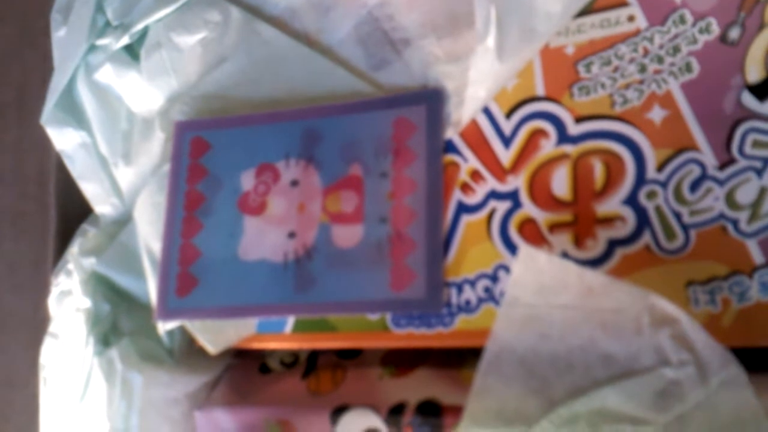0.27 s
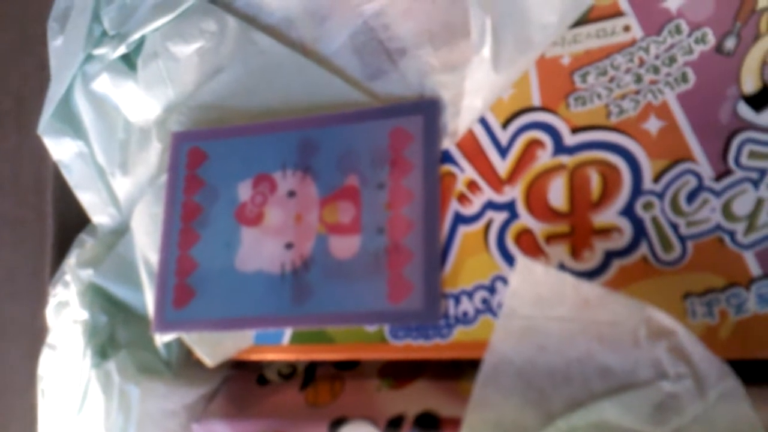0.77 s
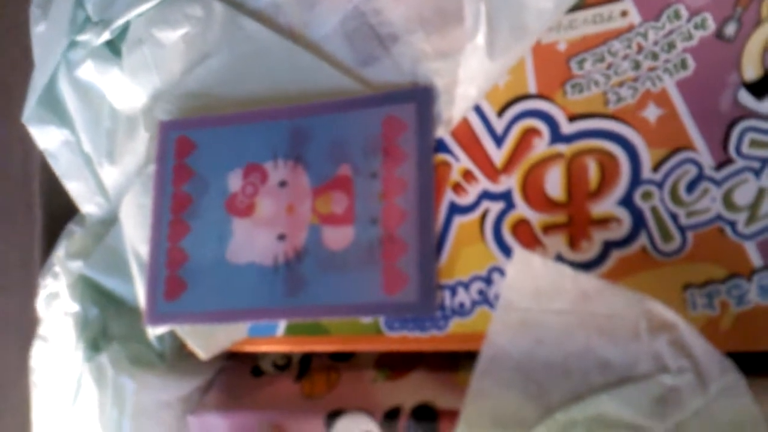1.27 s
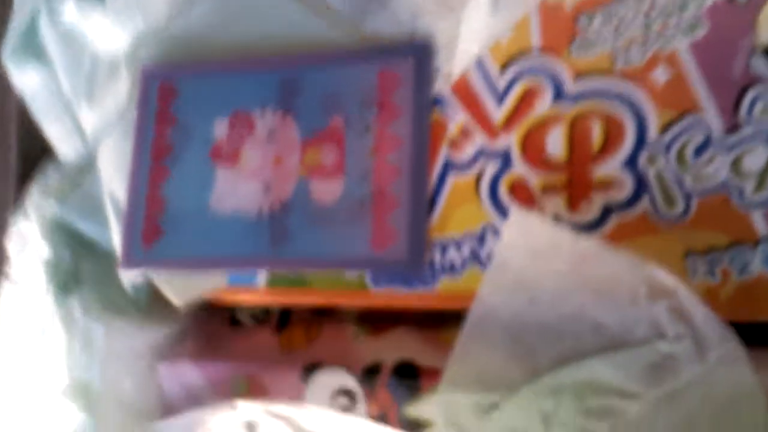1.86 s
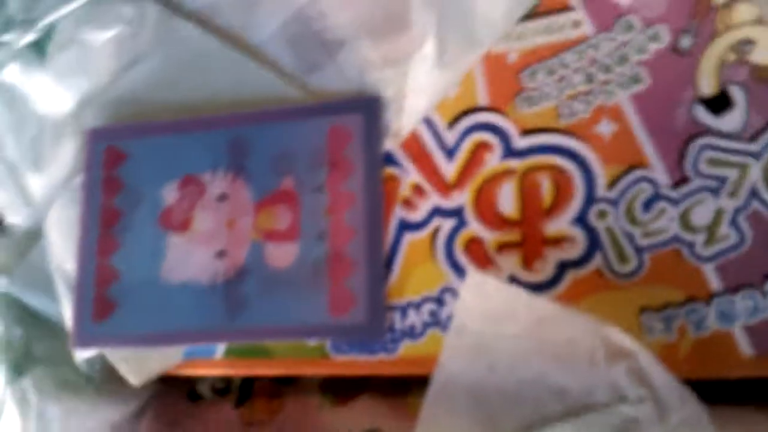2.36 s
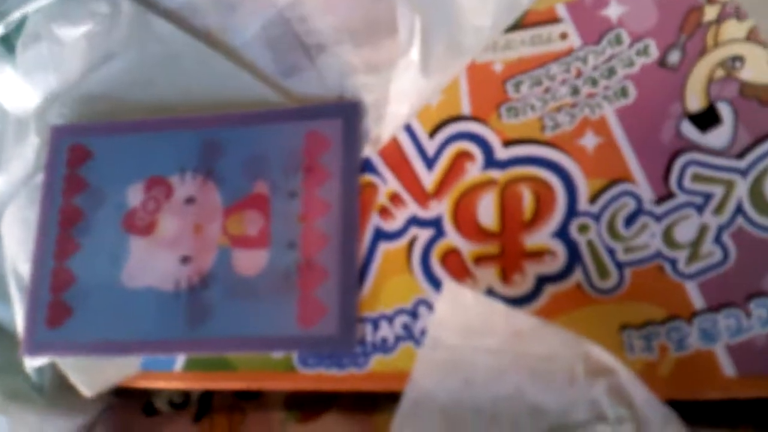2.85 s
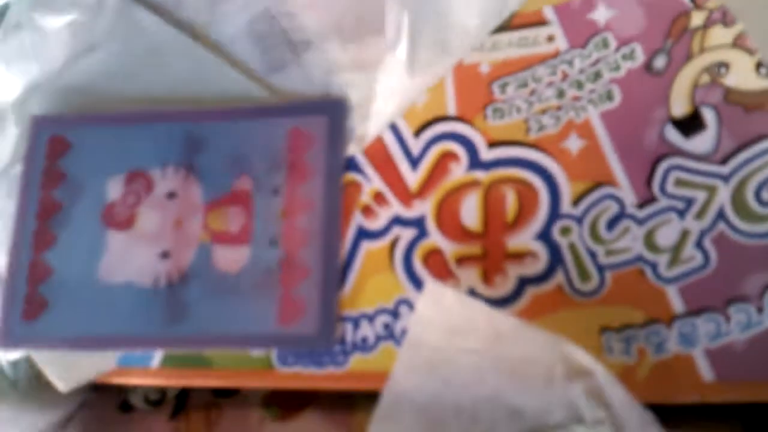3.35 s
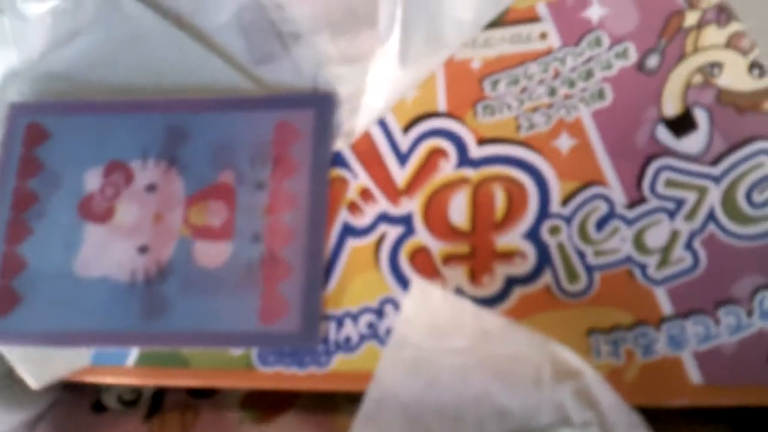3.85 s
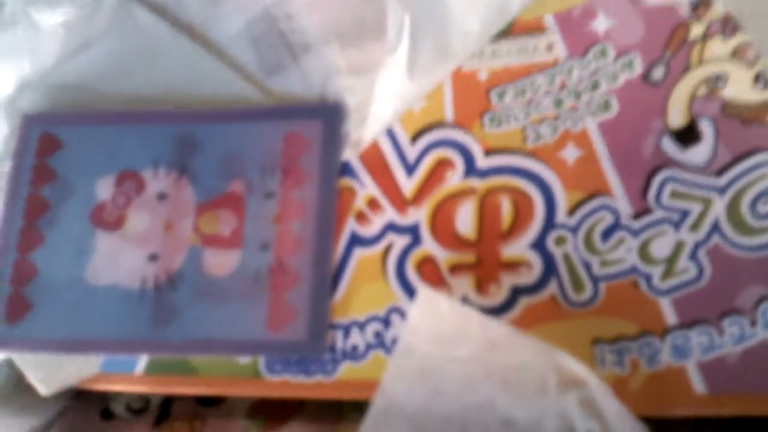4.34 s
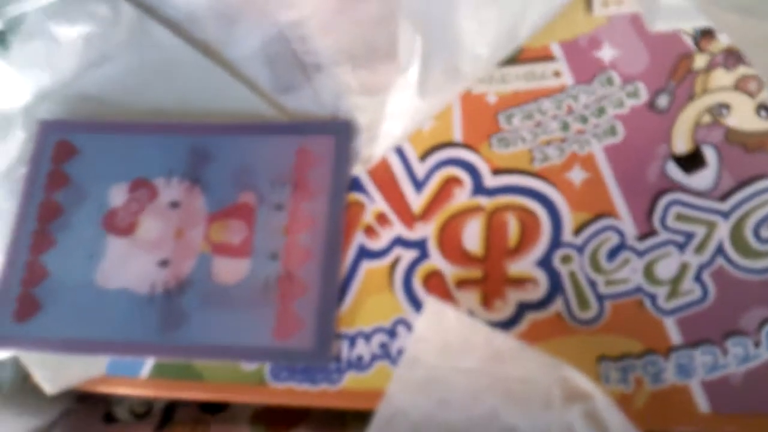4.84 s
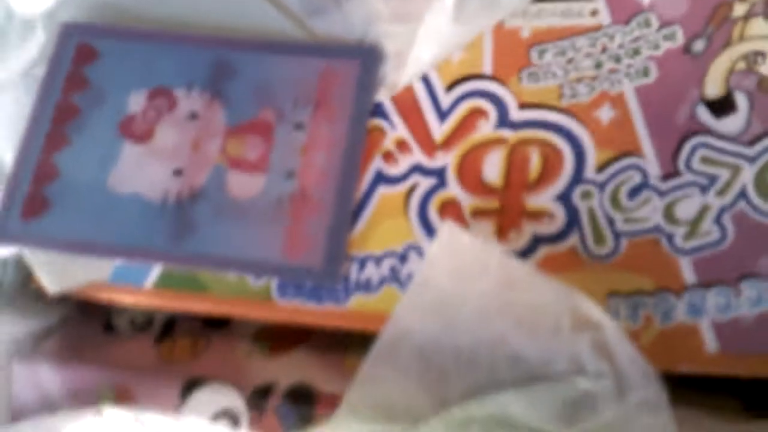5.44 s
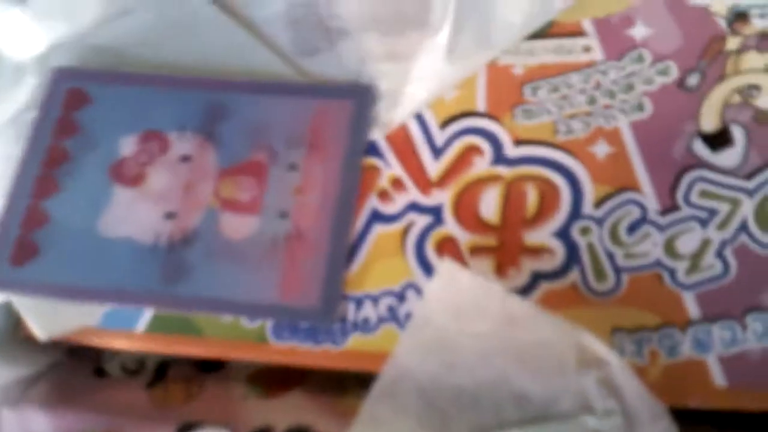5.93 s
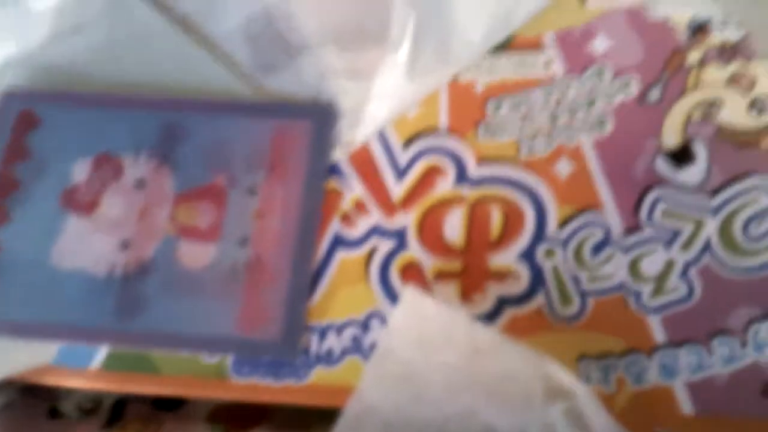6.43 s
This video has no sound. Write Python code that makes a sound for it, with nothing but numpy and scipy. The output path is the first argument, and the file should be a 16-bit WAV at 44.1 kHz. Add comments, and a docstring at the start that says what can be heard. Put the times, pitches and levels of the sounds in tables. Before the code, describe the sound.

Hands shift wrapped packets in crinkly paper, close to the microphone in a small quiet room. A dense burst of sharp snaps and brief rustles opens, thins to isolated ticks and soft knocks, then nearly stops. A second busy bout follows with brighter cracks and light cardboard taps, thins out, and ends on a quick, ratchety wrapper creak. Faint hiss, rumble and low hum stay underneath.

```python
"""Creases in tissue paper buckle with sharp snaps as hands shift a box of wrapped packets, close by in a small
quiet room. Each snap is a spike and decaying noise that excite the resonances of the paper. Rubbing sheets rustle
as flurries of random grains, and the packets knock softly as damped cosines with a tap of noise.
At the end a taut wrapper creaks: stick-slip pulses ring its resonances.
Filtered noise gives a steady hiss and rumble, and a sine a faint mains hum."""
import sys
import numpy as np
from scipy import signal
from scipy.fft import rfft, irfft
from scipy.io import wavfile

SR = 44100
rng = np.random.default_rng(int(sys.argv[2]) if len(sys.argv) > 2 else 0)


def unload_audio(sound):
    """Save the sound as a 16-bit wav file, at the path given as the first command line argument."""
    columns = np.transpose(np.atleast_2d(sound))
    # keep every value between -1 and 1, then stretch to whole-number steps
    steps = np.round(np.clip(columns, -1, 1) * 32767)
    wavfile.write(sys.argv[1], SR, steps.astype(np.int16))


N = 294588
TIME = np.arange(N) / SR

# Steady hiss and rumble: (frequency [Hz], relative spectral level [dB])
HISS_SPECTRUM = [(15, -67), (25, 2.5), (64, -8), (122, -8), (148, -12), (240, -11.5), (970, -24),
                 (3720, -19), (5880, -20.5), (15500, -20)]
# Pushes that rub the sheets: (start [s], length [s], rustle gain [dB], flutter relative to rustle [dB])
PUSHES = [(0.063, .12, -50, -8), (0.246, 0.037, -39.5, -8), (0.332, 0.11, -58, -1.5),
          (0.513, 0.026, -40.5, -9.5), (0.612, 0.087, -52, -7), (0.787, 0.054, -57, -2),
          (0.912, 0.036, -52, -0.5), (0.991, 0.049, -55, -6.5), (1.096, 0.044, -49.5, -22),
          (1.384, 0.12, -60.5, 0), (1.604, 0.14, -63, 0), (1.935, 0.019, -49.5, 1.5), (2.478, .2, -73.5, 5),
          (3.48, 0.093, -59.5, -1), (3.781, 0.022, -55, -6), (3.949, 0.037, -58.5, -3),
          (4.107, 0.11, -54.5, -0.5), (4.243, 0.18, -53, 0), (4.473, .12, -56.5, -0.5),
          (4.611, 0.023, -45.5, -4.5), (4.697, 0.0371, -61, -5), (4.781, .055, -45, -7),
          (4.899, 0.017, -33, -19.5), (4.937, 0.033, -47.5, -6), (5.122, .14, -51, -2.5),
          (5.282, 0.069, -47, -9), (5.421, 0.06, -61.5, 3.5), (5.543, 0.037, -53.5, -4),
          (5.988, 0.016, -48, -2), (6.155, 0.1, -71, 9.5), (6.395, 0.014, -55.5, -0.5),
          (6.524, 0.18, -63.5, 4)]
# Fine crackle of the paper: (frequency [Hz], relative spectral level [dB])
CRACKLE_SPECTRUM = [(900, -17.5), (1550, -8), (2200, -5.5), (4000, 1.5), (9500, -1), (13000, -5.5),
                    (16000, -34)]
# Fluttering sheets: (frequency [Hz], relative spectral level [dB])
FLUTTER_SPECTRUM = [(40, -5.5), (170, 4.5), (560, 3.5), (900, -4), (1550, -0.5), (6000, -26.5)]
# Loudest buckling creases:
# (time [s], crack level [dB], sheet body relative to crack [dB], treble relative to crack [dB])
SNAPS = [(0.0489, -29.5, -9, 0), (0.0544, -38, -7, 11), (0.0875, -35.5, -4, 0.5),
         (0.1176, -29.5, -11, -3.5), (0.1383, -35.5, -6, 2.5), (0.218, -40.5, 0, -2.5),
         (0.2776, -43, -9, 15), (0.2937, -41, -12, 9), (0.3094, -30, -3, 0), (0.3211, -29.5, -7.5, 9.5),
         (0.3734, -42.5, 2, 11.5), (0.3897, -37, -5, 1), (0.4201, -28.5, -6, 1.5), (0.4253, -32, -19, 11.5),
         (0.5072, -37.5, 2, 1.5), (0.5206, -24.5, -4, 2), (0.6365, -35, -1.5, 3.5), (0.646, -45, -19, 7),
         (0.757, -42, 2.5, 2), (0.8071, -54, 11.5, -1), (0.8798, -43, -11, -4), (0.8915, -44.5, -4, 5),
         (0.913, -26.5, -8, 4.5), (0.969, -50, 5, 12.5), (0.9962, -38.5, -1, 5), (1.0146, -50.5, 3.5, 12.5),
         (1.103, -44.5, 0, 0), (1.2502, -54.5, 0, 6.5), (1.2806, -48.5, -13, -0.5),
         (1.4049, -47, -0.5, -10), (1.5152, -38.5, -2.5, -3), (1.5923, -30, -3.5, -1), (1.6463, -42, 3, 0),
         (1.8565, -45, -8, -3.5), (1.925, -41, -6, 0), (1.9367, -43.5, 2, 6.5), (2.3061, -55.5, 1, -4),
         (2.448, -49.5, -2, -3), (2.5337, -58.5, 4, -12), (2.8817, -47.5, -18, -18),
         (3.3448, -54.5, -14, -0.5), (3.473, -38.5, -13.5, -0.5), (3.562, -49, -5, 0), (3.78, -47, -11, -1),
         (3.8022, -40, -12, -1), (3.8244, -46.5, -3, -2), (3.9491, -41.5, -6, 0.5), (4.01, -38, -11, -1),
         (4.102, -37, 1.5, 5), (4.127, -42, -2, 2), (4.1519, -33.5, -10, 5.5), (4.178, -40, -13, 7),
         (4.1935, -39, 2, 10), (4.2507, -45.5, 1, 4), (4.2698, -33.5, -11, -4), (4.287, -29.5, -7.5, 5),
         (4.3067, -38, -7, 3), (4.3178, -36, 2, 9), (4.3471, -41, 6.5, -1), (4.372, -30.5, -12, -20),
         (4.3932, -37, 2.5, -10), (4.5483, -48, 3.5, 9), (4.621, -38.5, 1, 9), (4.627, -38, -6, 2),
         (4.758, -38.5, 3, -3.5), (4.7896, -45, 11, 5), (4.8347, -37.5, -7, -5), (4.8858, -31.5, -3.5, -8),
         (4.9103, -29.5, -4, 1), (4.9703, -47, -2, 6), (5.0015, -34, -2.5, 3.5), (5.014, -36, -6, 2),
         (5.0261, -27.5, -1.5, 7), (5.118, -46, 14, -2), (5.163, -33.5, -21, 8.5), (5.213, -36, -6, 6.5),
         (5.2837, -36, 1, 4), (5.292, -37.5, -7, 7), (5.3463, -35, -7, 5.5), (5.5373, -45.5, -0.5, 3),
         (5.6168, -46, -3, 3.5), (5.8467, -48, -3, 3.5), (5.9145, -44, -7.5, -4.5), (5.988, -34.5, -2, 9),
         (6.2396, -41, -4, 0), (6.403, -43, -7, -9)]
# Resonances of the paper and the box around it: (frequency [Hz], width [Hz], relative level [dB])
PAPER_MODES = [(570, 130, 0), (1490, 170, 6), (2404, 93, 4.5)]
# Packets knocking together and their walls popping: (time [s], pitch [Hz], nominal level [dB])
KNOCKS = [(0.322, 890, -22.5), (0.512, 430, -30.5), (1.692, 680, -30.5), (1.741, 201, -42),
          (1.833, 170, -42.5), (1.938, 183.4, -35), (1.951, 69, -38), (1.968, 50, -42), (2.485, 241, -46.5),
          (3.562, 288, -36.5), (3.628, 89.4, -39.5), (4.076, 132, -42.5), (4.171, 167, -39),
          (4.286, 249.8, -34.5), (4.906, 142.1, -30), (4.906, 497, -26), (5.028, 1900, -18),
          (5.029, 517, -29.5), (5.118, 1767, -27), (5.169, 625, -24.5), (5.598, 74.6, -47),
          (5.845, 320, -37.5), (5.988, 316, -32), (5.998, 70.5, -40), (6.402, 380, -40.5)]
# Creaking wrapper: (time [s], nominal slip rate [1/s])
SLIP_RATES = [(6.458, 280), (6.478, 105), (6.514, 90), (6.527, 450), (6.547, 800), (6.559, 220),
              (6.571, 180), (6.604, 290), (6.68, 210)]
# Ring of the taut wrapper: (frequency [Hz], width [Hz], relative level [dB])
WRAPPER_MODES = [(4330, 620, 0.5), (5030, 470, -10), (10300, 720, -12), (1810, 4900, -16.5)]

HISS_DB = -61.5  # rms of hiss and rumble together
HUM_HZ, HUM_DB = 120, -70.5  # level is rms
TOP_HZ = 16000  # upper limit of the sound
# The rustle swells just before a push and dies away as the paper relaxes (time constants)
ATTACK_S, RELEASE_S = 0.012, 0.019
HOLDING_DB = -69.5  # least flutter gain, while the hands only hold the box
# Drive at 200 slips a second, before the creak's own gain; the longer the stick, the harder the slip
SLIP_DRIVE_DB, SLIP_DB_PER_OCTAVE = -32, -3.5


def undb(db):
    """Amplitude ratio from the logarithmic decibel scale."""
    return 10 ** (np.asarray(db) / 20)


def unit(x):
    """Normalization of mean power: scale to rms 1."""
    return x / np.sqrt(np.mean(x ** 2))


def band(x, lo_hz, hi_hz, order=2):
    """Causal Butterworth band-pass filtering."""
    edges_hz = [lo_hz, min(hi_hz, SR / 2.1)]
    sections = signal.butter(order, edges_hz, "band", fs=SR, output="sos")
    return signal.sosfilt(sections, x)


def ring(x, modes):
    """Modal superposition: parallel resonators of (frequency [Hz], width [Hz], level [dB])."""
    total = 0
    for hz, width_hz, db in modes:
        b, a = signal.iirpeak(hz, hz / width_hz, SR)
        total = total + undb(db) * signal.lfilter(b, a, x)
    return total


def colour(x, points):
    """Spectral shaping: weight by (frequency [Hz], level [dB]) on a log-frequency axis, at rms 1."""
    hz, db = np.transpose(points)
    bins_hz = np.maximum(np.fft.rfftfreq(N, 1 / SR), 1)
    gain = undb(np.interp(np.log(bins_hz), np.log(hz), db))
    return unit(irfft(rfft(x) * gain, N))


def add(out, s, sound):
    """Linear superposition of a short sound from time s."""
    i = max(int(s * SR), 0)
    out[i:i + len(sound)] += sound[:N - i]


def background():
    """Stationary filtered noise for hiss and rumble, with a sinusoidal mains hum."""
    hum = unit(np.sin(2 * np.pi * HUM_HZ * TIME))
    hiss = colour(rng.standard_normal(N), HISS_SPECTRUM)
    return undb(HISS_DB) * hiss + undb(HUM_DB) * hum


def pushes():
    """Exponential growth and relaxation: each push swells, holds and dies away in both rustle gains."""
    crisp, flutter = np.zeros(N), np.full(N, undb(HOLDING_DB))
    for s, length_s, db, low_db in PUSHES:
        before_s = np.maximum(s - TIME, 0)
        after_s = np.maximum(TIME - s - length_s, 0)
        envelope = np.exp(-before_s / ATTACK_S - after_s / RELEASE_S)
        crisp = np.maximum(crisp, undb(db) * envelope)
        flutter = np.maximum(flutter, undb(db + low_db) * envelope)
    return crisp, flutter


def crackle(per_s, spread_db, grain_s):
    """Random impulse noise: tiny creases yield in flurries, each a spike and a short shiver; rms 1."""
    chance = rng.random(N)
    strength = np.minimum(rng.exponential(size=N), 3.5)  # most faint, a few strong
    flurry = unit(band(rng.standard_normal(N), 25, 110))
    size = (chance < per_s / SR) * undb(spread_db * strength + 2 * flurry)
    # the energies of overlapping shivers add; the tiny offset keeps the root positive
    energy = signal.lfilter([1], [1, -np.exp(-1 / (grain_s * SR))], size ** 2 + 1e-18)
    shiver = np.sqrt(energy) * rng.standard_normal(N)
    spikes = 3 * size * rng.choice([-1, 1], N)
    return unit(shiver + spikes)


def rustle(crisp_db=-1.0, flutter_db=0.0, tick_db=-71):
    """Friction noise of rubbing sheets: fine crackle, duller flutter, and stray ticks as the paper settles."""
    crisp, flutter = pushes()
    grains = crackle(per_s=1700, spread_db=4.2, grain_s=.0003)
    flaps = crackle(per_s=450, spread_db=4.5, grain_s=.0014)
    settling = crackle(per_s=40, spread_db=3, grain_s=.0006)
    fine = colour(grains, CRACKLE_SPECTRUM) * crisp * undb(crisp_db)
    sheets = colour(flaps + grains, FLUTTER_SPECTRUM) * flutter * undb(flutter_db)
    ticks = colour(settling, CRACKLE_SPECTRUM) * undb(tick_db)
    return fine + sheets + ticks


def room(echo_s=0.0091, echo_db=-20, smear_s=0.0022, tail_db=-18, t60_s=0.18):
    """Reflection and reverberant decay: one smeared echo off a nearby surface, and a short furnished tail."""
    t = TIME[:SR // 2]
    smear = (t > echo_s) * np.exp(-np.abs(t - echo_s) / smear_s)
    echo = rng.standard_normal(len(t)) * smear
    decay = np.exp(-np.log(1000) * t / t60_s)  # 60 dB down at t60_s
    tail = band(rng.standard_normal(len(t)), 390, 14700, order=1) * decay
    return undb(echo_db) * echo / np.linalg.norm(echo) + undb(tail_db) * tail / np.linalg.norm(tail)


def small_creases(per_s=45, above_db=4, scatter_db=2, body_db=-3.5, treble_db=3.5, colour_db=3, count=12):
    """Random buckling under load: small creases give way during a push, the harder the louder."""
    rows = []  # columns as in SNAPS
    for s, length_s, db, _ in PUSHES:
        # one random moment in each interval of 1 / per_s
        moments_s = (np.arange(count) + rng.random(count)) / per_s
        for after_s, (loud, body, treble) in zip(moments_s, rng.standard_normal((count, 3))):
            if after_s < length_s and s + after_s < TIME[-1]:
                rows.append((s + after_s, db + above_db + scatter_db * loud,
                             body_db + colour_db * body, treble_db + colour_db * treble))
    return rows


def snaps(body_s=0.002, crack_s=.0014, treble_s=.001, spike=3.6, edge_db=5.5):
    """Snap-through buckling: a crease creeps, flips with one spike and shivers; the sheet body rings longer."""
    out, lead = np.zeros(N), 256  # lead: samples before the flip
    t = TIME[:1280] - TIME[lead]
    span = .003 * SR
    creep = undb(-18) * np.exp(-np.abs(t) / .002)
    for s, db, body_db, treble_db in SNAPS + small_creases():
        kick = spike * rng.choice([-1, 1]) * (t == 0)
        # a neighbouring fold mirrors the crack within about a millisecond and combs its spectrum
        mirror = rng.integers(10, 50)
        # (low edge [Hz], high edge [Hz], decay [s], level relative to crack [dB])
        parts = ((251, 2220, body_s, body_db), (2754, 6170, crack_s, 0), (5700, 11280, treble_s, treble_db))
        for lo_hz, hi_hz, decay_s, part_db in parts:
            swell = np.where(t < 0, creep, np.exp(-np.abs(t) / decay_s))
            flip = kick + swell * rng.standard_normal(len(t))
            flip = flip + .45 * np.roll(flip, mirror)
            facet_hz = rng.uniform(lo_hz, hi_hz)  # a pitch of its own
            ringing = ring(flip, PAPER_MODES + [(facet_hz, facet_hz / 4, 0)])
            part = band(flip + ringing, lo_hz, hi_hz, order=3)
            # level: rms if all the energy fell within three milliseconds
            level = undb(db + part_db) * np.sqrt(span / np.sum(part ** 2))
            add(out, s - TIME[lead], part * level)
        # the very edge of the crack reaches the highest treble
        edge = band(kick, 12000, TOP_HZ)
        add(out, s - TIME[lead], edge * undb(db + treble_db + edge_db))
    return out


def knocks(cycles=2.24, grip_s=0.007, rise_s=0.00064, tap=0.9, tap_s=0.0017):
    """Damped free vibration: cardboard thuds under the grip of the hands, each with a dull tap of contact."""
    out, t = np.zeros(N), TIME[:4096]
    for s, hz, db in KNOCKS:
        # the body's own loss scales with pitch; the grip adds a fixed one
        decay = np.exp(-t * hz / cycles - t / grip_s)
        thud = np.cos(2 * np.pi * hz * t) * decay * (1 - np.exp(-t / rise_s))
        contact = band(rng.standard_normal(len(t)) * np.exp(-t / tap_s), hz / 4, 2 * hz)
        add(out, s, undb(db) * (thud + tap * contact / np.abs(contact).max()))
    return out


def creak(gain_db=18.0, scatter_db=2.3, jitter=0.11, scrape_db=-31):
    """Stick-slip friction: every release is a tick that rings the wrapper, over a thin scrape."""
    times_s, rates = np.transpose(SLIP_RATES)
    rate = np.interp(TIME, times_s, rates)
    start_s = SLIP_RATES[0][0]
    drive_db = SLIP_DRIVE_DB + SLIP_DB_PER_OCTAVE * np.log2(rate / 200)
    size = undb(drive_db) * (TIME > start_s)
    slips, s = np.zeros(N), start_s
    for late, loud in rng.standard_normal((200, 2)):
        i = int(s * SR)
        if i >= N:
            break
        slips[i] = undb(scatter_db * loud)
        s += np.exp(jitter * late) / max(rate[i], 50)  # irregular sticking time
    scrape = undb(scrape_db) * rng.standard_normal(N)
    return undb(gain_db) * ring(size * (slips + scrape), WRAPPER_MODES)


def scene():
    """Superposition and convolution: paper, packets and wrapper sound directly and through the room."""
    floor, response = background(), room()
    handling = rustle() + knocks() + creak() + snaps()
    reflected = signal.fftconvolve(handling, response)[:N]
    return (floor + handling + reflected)[None]


def record(dry):
    """Band limitation: a steep elliptic low-pass cuts the top."""
    low_pass = signal.ellip(10, .2, 70, TOP_HZ, fs=SR, output="sos")  # order, ripple [dB], rejection [dB]
    return signal.sosfilt(low_pass, dry)


dry = scene()
out = record(dry)
unload_audio(out)
```